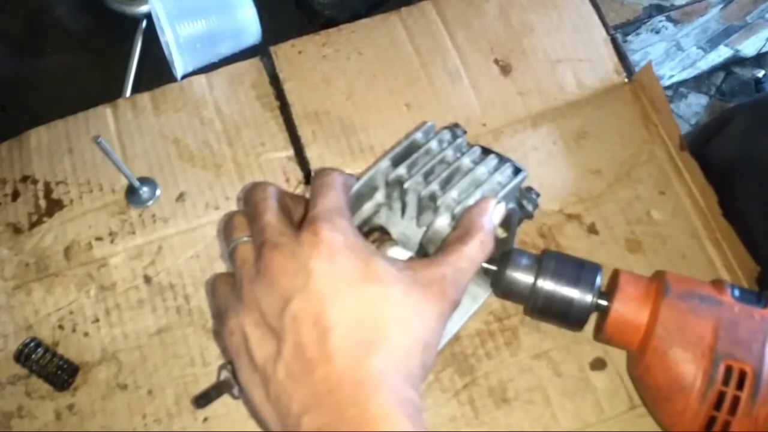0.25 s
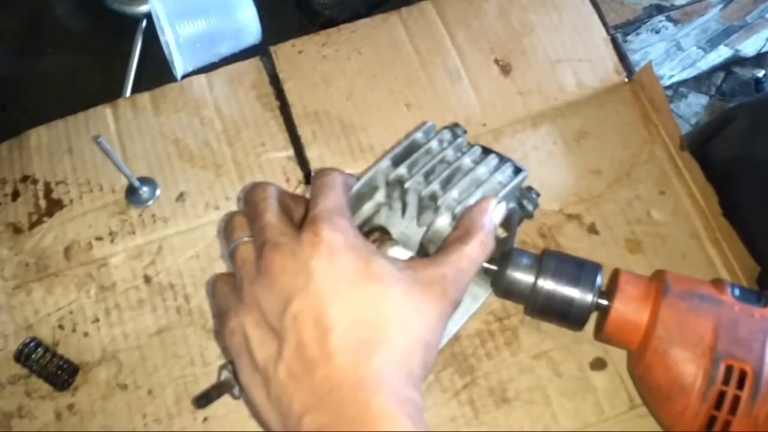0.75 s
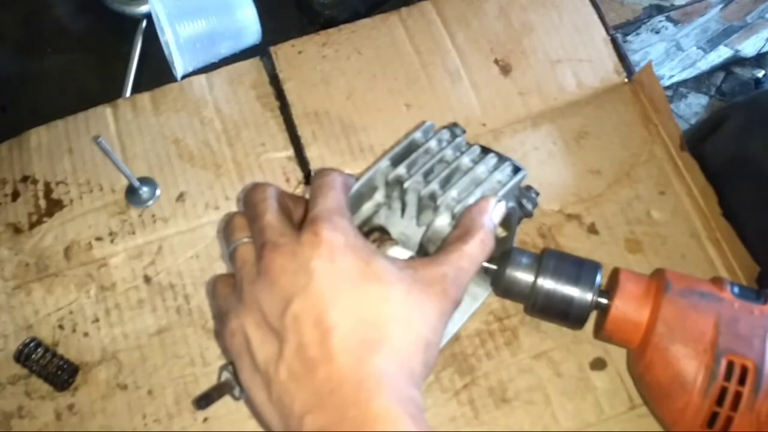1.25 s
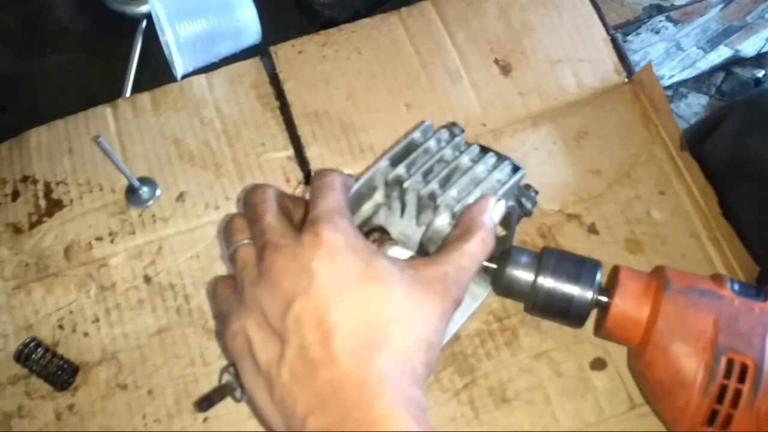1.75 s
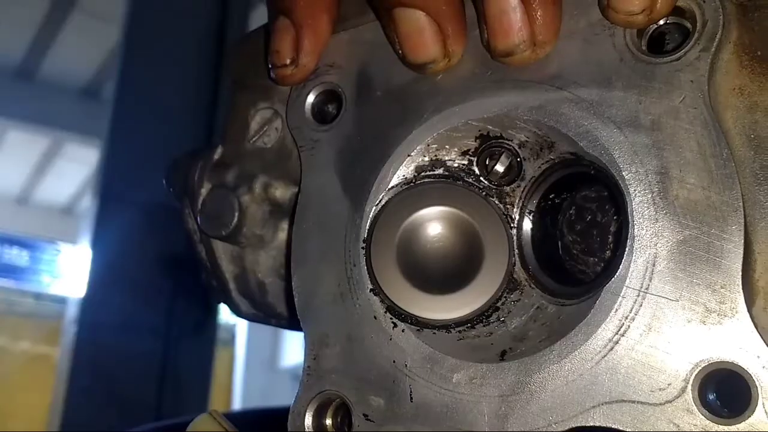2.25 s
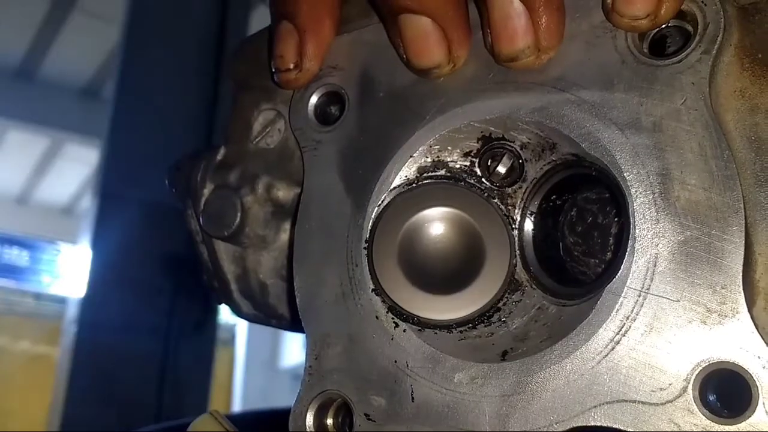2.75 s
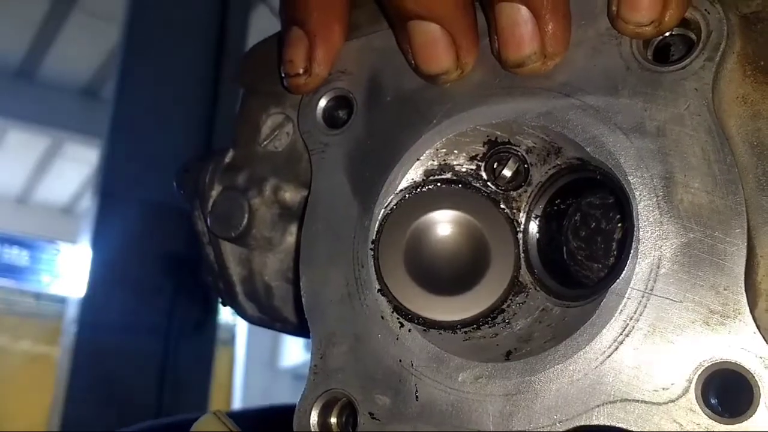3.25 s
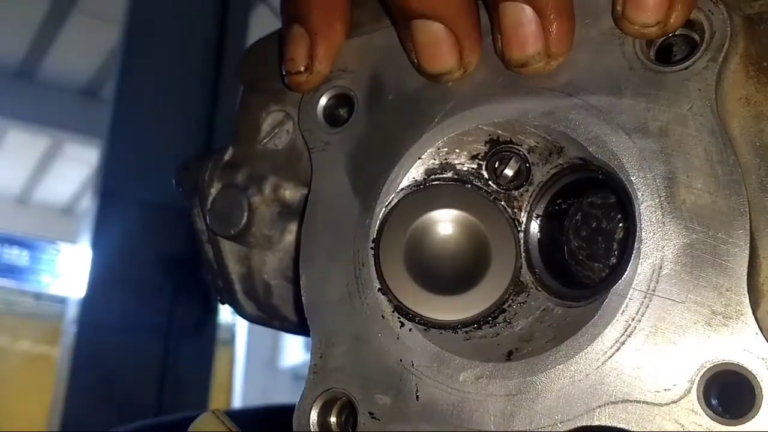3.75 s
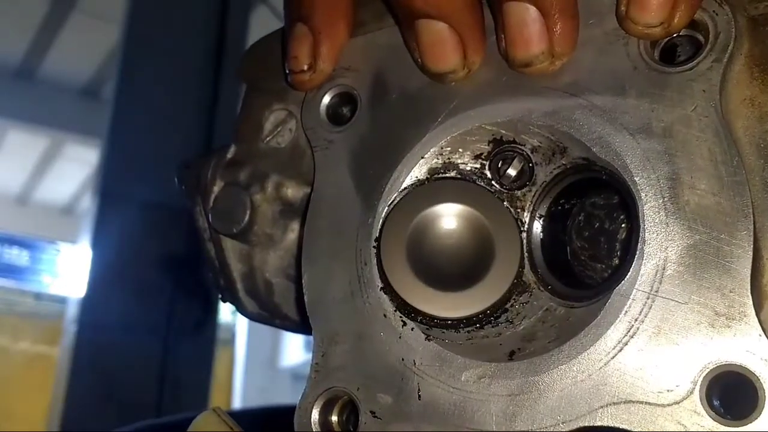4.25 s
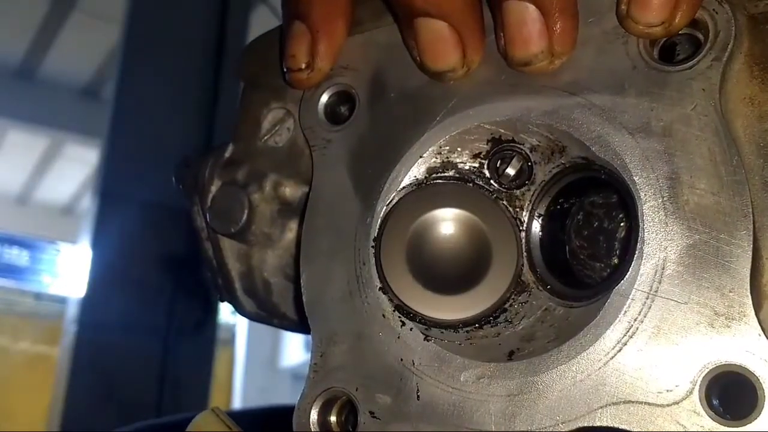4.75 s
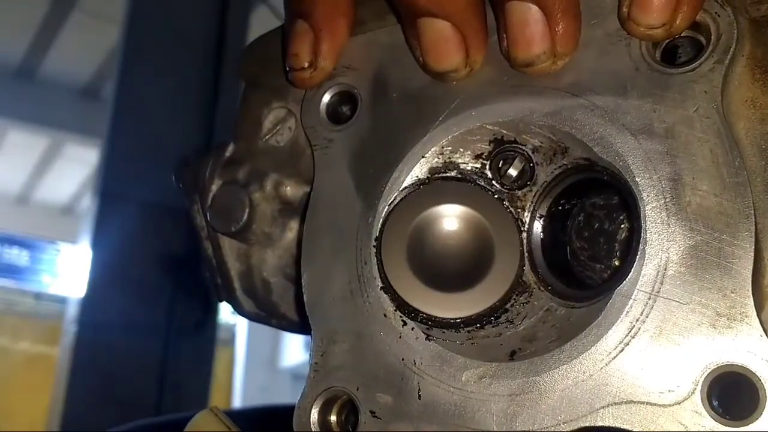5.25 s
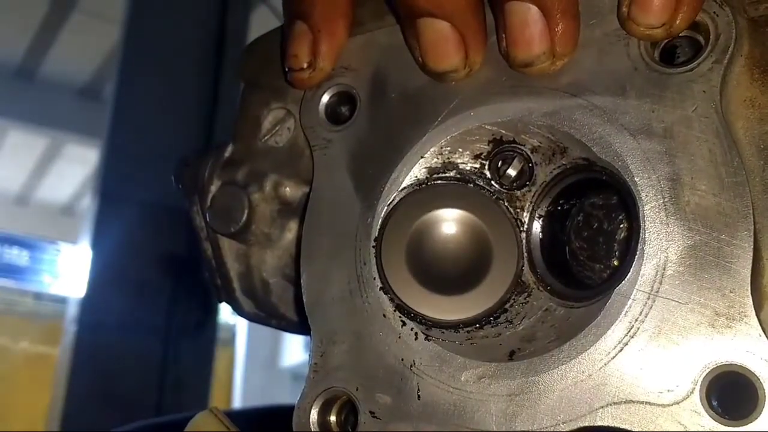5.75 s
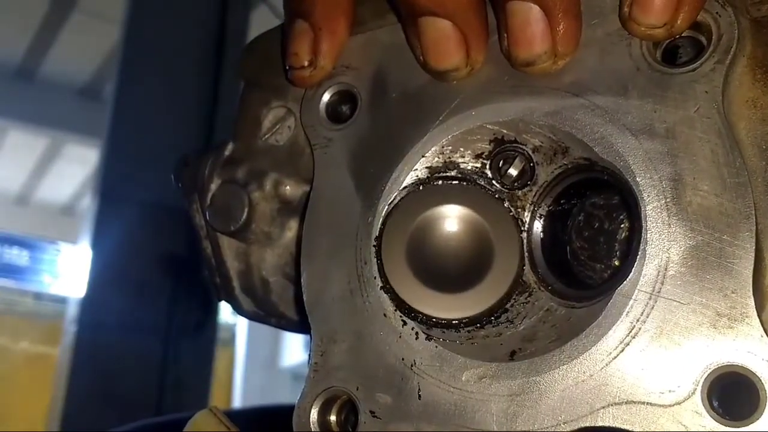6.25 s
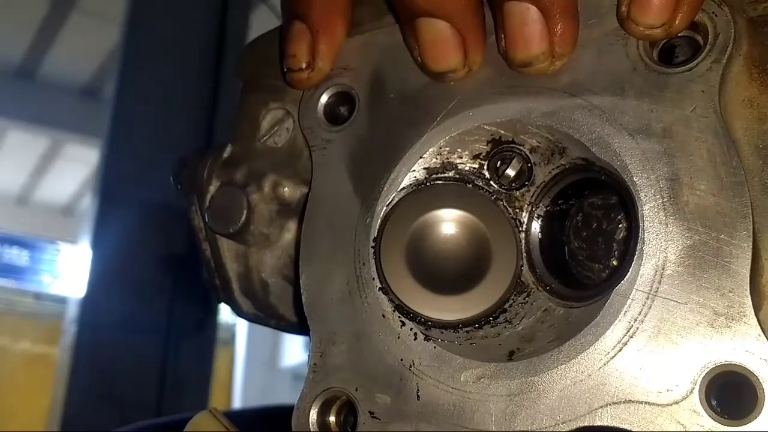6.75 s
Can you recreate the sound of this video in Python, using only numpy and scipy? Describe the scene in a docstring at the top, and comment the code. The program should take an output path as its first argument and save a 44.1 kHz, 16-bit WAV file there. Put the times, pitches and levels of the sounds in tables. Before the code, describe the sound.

Abrasive paste rasps between a spinning valve and a metal engine casting while the drill driving it whines, throbs and hisses. First heard from above a workbench, the drill briefly slows and recovers. The microphone is then suddenly right in front of the valve, where the grinding is fuller and the casting rumbles and judders. The drill slows once more, picks up and keeps running.

```python
"""A mains drill whines over a gritty rasp as it spins a valve against its seat in a cylinder head.
Armature and gears give the whine, which throbs with the mains, sags twice and surges back.
Grinding paste rasps through the ringing casting; brushes and cooling air hiss.
Heard first from above the bench, then from right in front of the valve, where the casting rumbles."""
import sys
import numpy as np
from scipy import signal
from scipy.fft import rfft, irfft, next_fast_len
from scipy.io import wavfile
from scipy.ndimage import uniform_filter1d

SR = 44100
rng = np.random.default_rng(int(sys.argv[2]) if len(sys.argv) > 2 else 0)


def materialize(psi):
    """Save the field psi as 16-bit PCM at rate SR to the path in sys.argv[1].

    A 1-D psi becomes a single channel; in a 2-D psi each row is a channel.
    """
    bounded = np.clip(np.atleast_2d(psi).T, -1, 1)
    quanta = np.round(bounded * 32767).astype(np.int16)
    wavfile.write(sys.argv[1], SR, quanta)


N = 308259
TIME_S = np.arange(N) / SR
FFT_SIZE = next_fast_len(N)
BINS_HZ = np.maximum(np.arange(FFT_SIZE // 2 + 1) * SR / FFT_SIZE, 1)
SIDE = np.array([[1], [-1]])   # left, right

# motor speed (time [s], speed [rev/s])
MOTOR_SPEED = [(0, 412.4), (0.25, 423.3), (0.95, 431.5), (1.3, 431.3), (1.56, 352), (1.7, 379), (1.84, 401),
               (1.87, 429.5), (2.08, 434.2), (2.45, 439.2), (2.95, 440), (3.2, 357), (3.33, 394),
               (3.47, 422.5), (4.02, 433.2), (4.3, 447.8), (4.62, 438), (4.95, 435.5), (5.15, 440),
               (5.4, 448.5), (5.7, 441), (5.87, 441), (6.0, 447), (6.24, 453.0), (6.6, 438.6),
               (6.99, 440.5)]
# hand pressure on the valve (time [s], level [dB])
PRESSURE = [(0, 2), (0.08, 1), (0.17, -0.5), (0.35, 0.5), (0.43, 0.5), (0.5, 4), (0.57, 0), (0.7, 3),
            (0.78, 0.9), (0.97, 3.5), (1.08, 1.2), (1.36, 0.5), (1.54, -3.5), (1.58, 0.7), (1.68, 1),
            (1.83, 3), (1.855, -6.5), (1.92, -4), (1.98, -2), (2.18, 0), (2.33, 1.5), (2.39, -0.5),
            (2.59, 0), (2.66, -2), (2.87, 0.2), (3.04, -1.5), (3.195, -2), (3.22, 0), (3.36, 2),
            (3.48, -1.9), (3.68, 0.5), (3.76, 2), (3.87, 1.4), (3.98, -0.7), (4.22, 0), (4.35, 0.5),
            (4.44, -1.5), (4.8, 0.5), (5.2, -0.5), (5.4, 0.3), (5.49, -3), (5.68, 0), (6.03, -0.7),
            (6.14, 2), (6.235, 1.5), (6.26, -1), (6.45, -0.5), (6.62, 0.5), (6.92, -2.5), (6.99, 0)]
# drill body resonances (frequency [Hz], width [Hz], gain [dB])
BODY_RINGS = [(450.4, 11, 10), (735, 31, 0), (914, 29, 4.5)]
# gear case radiation to the microphones
# (frequency [Hz], in phase above [dB], antiphase above [dB], in phase front [dB], antiphase front [dB])
GEAR_CASE = [(1420, -11, -11, -5, 1), (1460, -3, -8, -3, -4), (1570, 4.5, 0, -3.5, -4),
             (1590, -2, -4, -2, -5), (1690, -7, 0, -6, -12), (1694, -15, -6, -8.5, 2),
             (1739, -23, -4, -1.5, 2), (1750, -22, 1, -5.5, 1.5), (1836, -18, -9, -14.5, -7),
             (1823, 3, -4, -16, 1), (1910, -9, -6, -20, -12)]
# armature, bearing and fan whines (order [cycles/rev], level re hiss [dB])
WHINE_ORDERS = [(8, -14.5), (12, -23), (16, -23), (20, -29), (24, -30), (40, -17)]
# housing resonances (frequency [Hz], width [Hz], gain above [dB], gain front [dB])
HOUSING_RINGS = [(3070, 160, 0, -1), (5200, 220, 0, 7), (5900, 200, 12, 0), (6480, 200, 7, 12),
                 (8880, 130, 0, 18), (10360, 120, 10, 0)]
# broad radiated spectrum at each place (frequency [Hz], gain [dB])
COLOUR_ABOVE = [(40.0, -20), (100.0, -14), (200.0, -7.5), (285.0, -17.5), (360.0, -8), (800.0, -1.5),
                (1400.0, -7.5), (2200.0, -12), (4200.0, -17.5), (6500.0, -15), (10000.0, -17),
                (15000.0, -18)]
COLOUR_FRONT = [(40, -29), (80, -20), (105, -18.5), (150, -4), (205, -4), (300.0, -15.5), (420.0, -10.5),
                (800.0, -8), (1300.0, -19.5), (2200.0, -15.5), (3200, -21), (4200.0, -24.5),
                (7000.0, -24.5), (10500.0, -34.5), (15000.0, -28)]
# casting and housing resonances at each place (frequency [Hz], width [Hz], gain [dB])
RINGS_ABOVE = [(580, 210, 1.5), (1210, 93, 2), (1400, 120, -4), (1676, 140, 3.5), (1844, 120, 7),
               (2100, 120, -5.5), (2200, 150, 1), (2840, 2400, 7), (5100, 150, 1.5), (6130, 190, 3.5),
               (7800, 220, 3), (8840, 400, 2.5), (10230, 140, 12), (15800, 500, 1)]
RINGS_FRONT = [(477, 100, 1.5), (705, 37, 5.5), (924, 250, 5), (1018, 164, 9), (1200, 47, -4.5),
               (1497, 750, 10.5), (1780, 57, 6.5), (1826, 110, 4.5), (2010, 84, 0.5), (2610, 290, 4.5),
               (4850, 48, 7), (5100, 240, 12.5), (7050, 150, 2), (8800, 230, 10), (10740, 2400, 10.5),
               (15700, 350, 2.7)]
# judders of the casting in the hand (time [s], rumble gain [dB])
JUDDERS = [(2.25, 4), (2.54, 7), (3.235, 1.5), (3.5, 7), (3.95, 5), (4.61, 8), (6.32, 8)]
# bench, hand and wall reflections (delay [s], gain [dB])
ECHOES = [(.0019, -26.5), (.0043, -69), (.0079, -24), (0.0136, -18.5)]
# microphone pair (frequency [Hz], left phase lead [rad], coherence [0-1])
MIC_PAIR = [(300.0, 0.0, 0.95), (750.0, 0.0, 0.97), (1200.0, -0.9, 0.85), (1480, -1.4, 0.65),
            (1740, -3.95, 0.65), (2400.0, -4.6, 0.47), (3200.0, -8.3, 0.71), (3800.0, -9.0, 0.39),
            (4200.0, -12.57, 0.86), (4550.0, -12.57, 0.97), (5250.0, -15.71, 1.0), (5560.0, -15.71, 1.0),
            (6100.0, -18.85, 0.72), (6400.0, -18.85, 0.81), (7200.0, -22.0, 0.69), (8000.0, -26.5, 0.14),
            (8800.0, -27.0, 0.62), (9700.0, -24.8, 0.8), (10420.0, -21.99, 1.0), (11150.0, -21.99, 1.0),
            (11550.0, -18.85, 0.58), (12200.0, -18.2, 0.45), (13000.0, -16.0, 0.41), (13700.0, -15.6, 0.66),
            (14300.0, -12.7, 0.38), (15200.0, -12.5, 0.5)]
# stereo balance (frequency [Hz], left minus right [dB])
MIC_BALANCE = [(300, 4.5), (450, -2), (800, 1.9), (1100, -0.5), (1450, -5.5), (2200, -.5), (3300, 1.2),
               (5200, 0), (5700, 0), (8000, .6), (10300, 0), (15000, 0)]

# base levels (above [dB], front [dB], slope with pressure [dB/dB])
ARMATURE_LEVEL = (-48, -32, 0.98)
GEAR_LEVEL = (-37, -31.5, 0.46)
RASP_LEVEL = (-32.5, -26, 0.88)
HISS_LEVEL = (-35, -32.5, 0.7)
RUMBLE_LEVEL = (-58.5, -32.5, 0.86)

MOVE_S = 1.85   # listener moves from above to front
MAINS_PULSE_HZ, FULL_SPEED_RPS = 120, 440
GEAR_RATIO = 10.2   # motor turns per valve turn


def from_db(db):
    """Decibels to gain."""
    return 10 ** (np.asarray(db) / 20)


def unit_rms(x):
    """Scale to rms 1."""
    return x / np.sqrt(np.mean(x ** 2) + 1e-20)


def at_samples(rows):
    """A (time, value) curve at every sample."""
    return np.interp(TIME_S, *np.transpose(rows))


def at_bins(rows):
    """Each column of a spectrum at every frequency bin."""
    hz, *columns = np.transpose(rows)
    return [np.interp(np.log(BINS_HZ), np.log(hz), column) for column in columns]


def filtered(x, response):
    """Apply a gain per frequency bin."""
    return irfft(rfft(x, FFT_SIZE) * response, FFT_SIZE)[..., :N]


def drift(rate_hz):
    """Smooth random wander, rms about 1."""
    hz = np.linspace(0, 500, 4097)
    slow = irfft(rfft(rng.standard_normal(8192)) / (1 + (hz / rate_hz) ** 2))
    return np.interp(TIME_S, np.arange(len(slow)) / 1000, unit_rms(slow))


def by_place(above, front):
    """Crossfade from above the bench to in front of the valve in 20 ms."""
    moved = np.clip((TIME_S - MOVE_S) / .02, 0, 1)
    return (1 - moved) * above + moved * front


def layer_db(level, pressure_db):
    """Level set by listening place, rising with pressure on the valve."""
    above_db, front_db, slope = level
    return by_place(above_db, front_db) + slope * pressure_db


def resonate(x, rings):
    """Each resonance lifts or notches a narrow band."""
    for hz, width_hz, db in rings:
        tuning = -2 * np.cos(2 * np.pi * hz / SR)
        damp, lift = np.pi * width_hz / SR, from_db(db / 2)
        x = signal.lfilter([1 + damp * lift, tuning, 1 - damp * lift],
                           [1 + damp / lift, tuning, 1 - damp / lift], x)
    return x


def pickup(speed_rps, full_rps_per_s=180):
    """Motor acceleration, 0-1; negated speed gives coasting."""
    acceleration = np.gradient(speed_rps) * SR
    return uniform_filter1d(np.clip(acceleration / full_rps_per_s, 0, 1), size=800)


def mains_throb(depth):
    """Torque swells on each half wave of the mains."""
    return 1 + depth * np.cos(2 * np.pi * MAINS_PULSE_HZ * TIME_S)


def motor_order(phase, level_db, throb, sway_rad, rough):
    """One tone: torque pulses swell and sway it into side tones; gear play makes it flutter."""
    flutter = (1 + rough * (drift(13) + 1j * drift(72))) / np.sqrt(1 + 2 * rough ** 2)
    swayed = phase - sway_rad * np.sin(2 * np.pi * MAINS_PULSE_HZ * TIME_S)
    return np.sqrt(2) * from_db(level_db) * mains_throb(throb) * (flutter * np.exp(1j * swayed)).real


def motor_hum(angle, armature_db, gears_db):
    """The armature hums at orders 1 and 2 through the drill body; the gearing adds a faint order 8."""
    unbalance = motor_order(angle, armature_db - 18.5, throb=0.68, sway_rad=0.084, rough=0.051)
    wavering_db = armature_db - .8 - 1.25 * drift(11)
    armature = motor_order(2 * angle, wavering_db, throb=0.093, sway_rad=0.072, rough=0.16)
    overtone_db = gears_db + by_place(-13, -12)
    overtone = motor_order(8 * angle, overtone_db, throb=0.11, sway_rad=0.46, rough=0.47)
    return resonate(unbalance + armature, BODY_RINGS) + overtone


def gear_whine(angle, level_db, strain, rattle_rad=1.3, rattle_db=5.5, right_bias_db=3):
    """Gears whine at order 4 and rattle under strain; the case picks out the tone or its side tones."""
    jitter = rattle_rad * strain * drift(150)
    mesh = motor_order(4 * angle + jitter, level_db + rattle_db * strain, throb=0.48,
                       sway_rad=by_place(-0.21, 0.12), rough=by_place(0.4, 0.35))
    above, front = [filtered(mesh, from_db(in_phase_db) + 1j * SIDE * from_db(antiphase_db))
                    for in_phase_db, antiphase_db in np.reshape(at_bins(GEAR_CASE), (2, 2, -1))]
    return by_place(above, front) * from_db(-SIDE * right_bias_db / 2)


def faint_whines(angle, level_db, waver_db=2.5, smear_rad=0.58):
    """High orders blurred by bearing play; each squeals as it crosses a housing resonance."""
    whine = 0
    for order, db in WHINE_ORDERS:
        gain = from_db(db + waver_db * drift(3.5))
        phase = order * angle + smear_rad * drift(38) + rng.uniform(0, 2 * np.pi, (2, 1))
        whine += gain * np.sin(phase)
    above = resonate(whine, [(hz, width_hz, db) for hz, width_hz, db, _ in HOUSING_RINGS])
    front = resonate(whine, [(hz, width_hz, db) for hz, width_hz, _, db in HOUSING_RINGS])
    return from_db(level_db) * mains_throb(1.0) * by_place(above, front)


def grit(grains_per_s, spread_db):
    """Abrasive grains crack at random, most small, a few large."""
    sizes = from_db(spread_db * np.minimum(rng.exponential(1, (2, N)), 5))
    signs = rng.choice([-1, 1], (2, N))
    cracks = rng.random((2, N)) < grains_per_s / SR
    return unit_rms(sizes * signs * cracks)


def through_casting(force, low_hz, high_hz):
    """One band of a force as the casting radiates it to each place; rms about 1."""
    band = 1 / np.sqrt((1 + (low_hz / BINS_HZ) ** 12) * (1 + (BINS_HZ / high_hz) ** 12))
    above = filtered(resonate(force, RINGS_ABOVE), band * from_db(at_bins(COLOUR_ABOVE)[0]))
    front = filtered(resonate(force, RINGS_FRONT), band * from_db(at_bins(COLOUR_FRONT)[0]))
    return by_place(unit_rms(above), unit_rms(front))


def paste_rasp(angle, level_db, strain, flutter_db=0.83):
    """Paste crushed on the seat bites harder twice a valve turn and growls as the drill picks up."""
    bite = 1 + 0.046 * np.cos(2 * angle / GEAR_RATIO)
    load = mains_throb(0.025) * bite * from_db(flutter_db * drift(41))
    scrape = through_casting(grit(grains_per_s=24000, spread_db=2) * load, low_hz=290, high_hz=2120)
    growl = through_casting(grit(grains_per_s=4100, spread_db=1) * load, low_hz=298, high_hz=880)
    return from_db(level_db) * (scrape + strain * from_db(by_place(-3, -4)) * growl)


def brush_hiss(level_db, flutter_db=0.86):
    """Brush sparks and the finest grains crackle in the rush of cooling air."""
    crackle = grit(grains_per_s=8000, spread_db=2)
    air = 1.72 * rng.standard_normal((2, N))
    gain = from_db(level_db + flutter_db * drift(12))
    return gain * through_casting((crackle + air) * mains_throb(0.018), low_hz=2500, high_hz=18100)


def casting_rumble(angle, level_db, lead_rad=2.46, scatter=0.12):
    """The casting shudders, hums and wobbles twice a valve turn, near antiphase at the microphones."""
    shudder, stray = through_casting(rng.standard_normal((2, N)), low_hz=25, high_hz=296)
    hum = from_db(-11) * np.sin(2 * np.pi * MAINS_PULSE_HZ * TIME_S)
    wobble = from_db(-17 + 2.6 * drift(4.4)) * np.sin(2 * angle / GEAR_RATIO)
    shake = signal.hilbert(shudder + hum + wobble, FFT_SIZE)[:N]
    pair = (shake * np.exp(SIDE * 1j * lead_rad / 2)).real
    return from_db(level_db) * (pair + scatter * stray)


def shaking_db(strain, coast, judder_s=0.032, wear_db_per_s=-.5):
    """In front, the rumble follows torque, jumps at judders and eases as the seat wears smooth."""
    torque_db = 2 * strain - 5 * coast
    judder_db = sum(db * np.exp(-((TIME_S - at_s) / judder_s) ** 2) for at_s, db in JUDDERS)
    wear_db = wear_db_per_s * (TIME_S - TIME_S.mean())
    return by_place(0, torque_db + judder_db + wear_db)


def reflect(x):
    """Short echoes from near surfaces ripple the spectrum."""
    echoes = sum(from_db(db) * np.exp(-2j * np.pi * BINS_HZ * delay_s) for delay_s, db in ECHOES)
    return filtered(x, 1 + echoes)


def microphones(direct, scattered):
    """Left and right carry the direct sound with a phase difference that turns with frequency; workshop scatter
    lowers its coherence."""
    lead_rad, coherence = at_bins(MIC_PAIR)
    coherence = np.clip(coherence, 0, 1)
    steer = np.exp(SIDE * 1j * lead_rad / 2) * from_db(SIDE * at_bins(MIC_BALANCE)[0] / 2)
    common = filtered(direct, steer * np.sqrt((1 + coherence) / 2))
    opposed = filtered(scattered, steer * np.sqrt((1 - coherence) / 2))
    return common + SIDE * opposed


def scene():
    """Motor angle drives whine and valve; hand pressure scales every layer."""
    speed_rps, pressure_db = at_samples(MOTOR_SPEED), at_samples(PRESSURE)
    angle = 2 * np.pi * np.cumsum(speed_rps * (1 + 0.001022 * drift(8.55))) / SR
    strain, coast = pickup(speed_rps), pickup(-speed_rps)
    surge = uniform_filter1d(pickup(speed_rps, full_rps_per_s=27) ** 6, size=4000)
    overspeed_rps = np.maximum(speed_rps - FULL_SPEED_RPS, 0)

    # fresh drive: armature louder, gears mesh tightly and quieten; both fade while coasting
    armature_db = layer_db(ARMATURE_LEVEL, pressure_db) + 1.0 * surge - 2.2 * coast ** 2
    gears_db = layer_db(GEAR_LEVEL, pressure_db) - 7.5 * surge - 4.5 * coast ** 2
    rasp_db = layer_db(RASP_LEVEL, pressure_db) + 0.03 * overspeed_rps + 1.0 * coast
    hiss_db = layer_db(HISS_LEVEL, pressure_db)
    rumble_db = layer_db(RUMBLE_LEVEL, pressure_db) + shaking_db(strain, coast)

    grinding = paste_rasp(angle, rasp_db, strain) + brush_hiss(hiss_db)
    direct, scattered = reflect(grinding) + faint_whines(angle, hiss_db)
    heard = microphones(direct + motor_hum(angle, armature_db, gears_db), scattered)
    return heard + gear_whine(angle, gears_db, strain) + casting_rumble(angle, rumble_db)


def record(dry):
    """Steep low-pass at 15.5 kHz."""
    return signal.sosfilt(signal.ellip(12, .1, 90, 15500, fs=SR, output="sos"), dry)


dry = scene()
out = record(dry)
materialize(out)
```